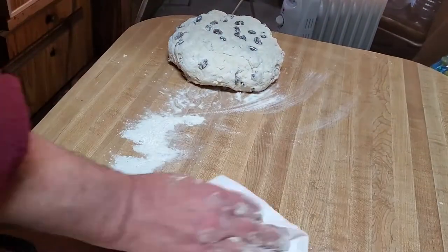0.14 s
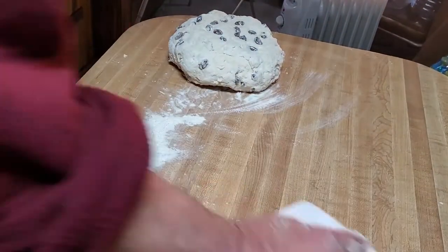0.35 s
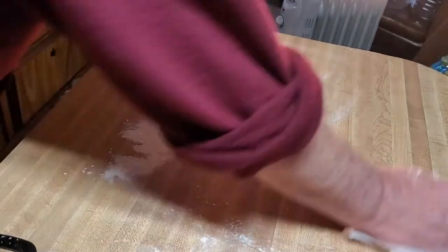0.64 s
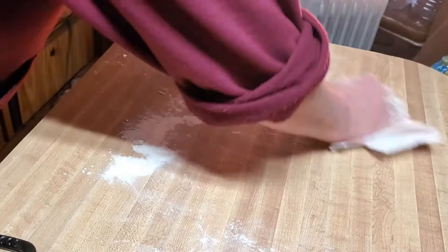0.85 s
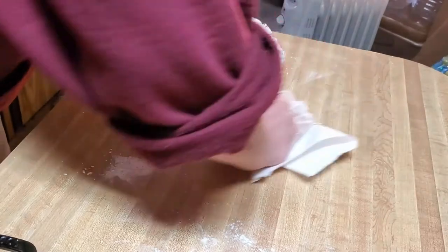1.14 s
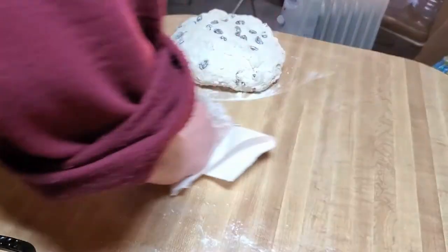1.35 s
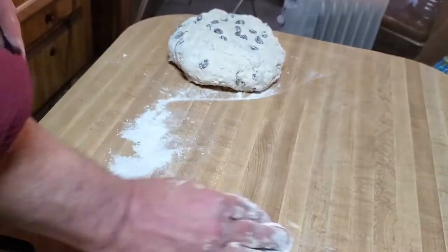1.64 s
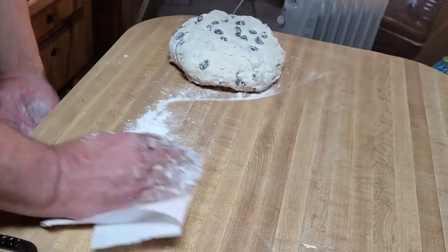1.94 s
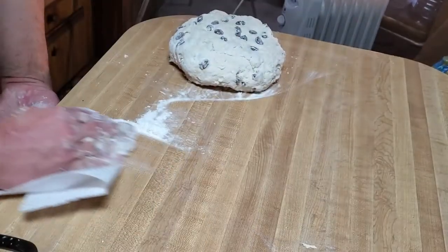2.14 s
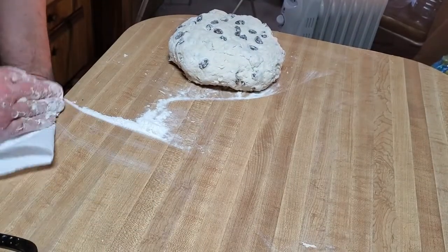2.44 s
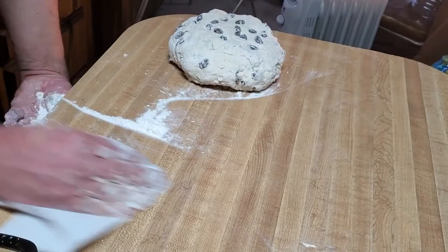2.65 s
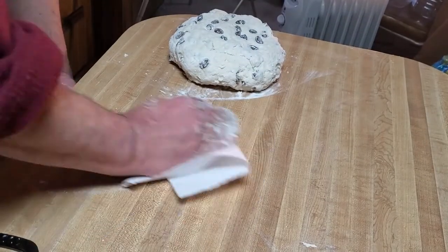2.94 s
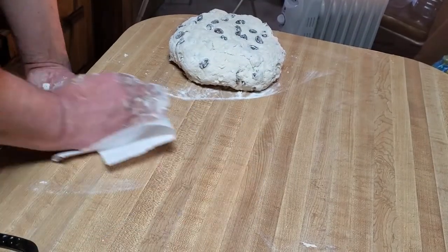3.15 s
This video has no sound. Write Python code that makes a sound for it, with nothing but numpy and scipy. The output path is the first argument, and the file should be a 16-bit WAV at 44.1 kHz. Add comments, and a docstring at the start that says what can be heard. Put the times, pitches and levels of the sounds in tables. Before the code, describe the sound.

A paper towel wipes a floury wooden table, heard close in stereo in a quiet kitchen. A gritty, airy hiss with papery scraping starts at once, with soft bumps around 0.2-0.4 s, and stops near 1.5 s with a tiny tick. The second stroke runs 1.57-2.4 s, with a deep soft thump near 1.75 s. A brisk, brighter third stroke runs from 2.57 s to the end, over faint air and low hum.

```python
"""A hand wipes a paper towel over a floury wooden table in three strokes, close to a small stereo microphone.
The first stroke starts at once: filtered random grains make the flour's hiss, two paper scrapes and the table's hum.
Decaying sine modes thump under the leaning hand; a short ringing tick falls in the first pause, at 1.5 s.
A second stroke runs from about 1.57 to 2.4 s, a third from about 2.57 s to the end.
Shaped noise gives quiet kitchen air and a low, quiet drone throughout."""
import sys
import numpy as np
from scipy import signal
from scipy.io import wavfile
from scipy.ndimage import uniform_filter1d

SR = 44100
rng = np.random.default_rng(int(sys.argv[2]) if len(sys.argv) > 2 else 0)


def generate_wav(sig):
    """Save sig (samples, or channels by samples) to the path in sys.argv[1] as 16-bit PCM at SR."""
    pcm = np.round(np.clip(np.atleast_2d(sig).T, -1, 1) * 32767).astype(np.int16)
    wavfile.write(sys.argv[1], SR, pcm)


N = 145530  # 3.3 s

# Course of the wiping. Each row: time in seconds, then rms levels in dB of the hiss, the upper scrape,
# the lower scrape and the table-top hum, and the left-right balance in dB before PAN_MEAN_DB is taken off.
WIPE_COURSE = [(0.0, -51, -61, -67, -64, 4), (0.05, -48.5, -52.5, -63, -66.5, 3),
               (0.11, -48.5, -56, -59, -58, 4.5), (0.13, -48, -50.5, -52.5, -51.5, 2),
               (0.15, -50, -47, -50.5, -55.5, 4.5), (0.27, -49, -54, -58, -59, 1.5),
               (0.28, -52.5, -56, -59.5, -66, 1.5), (0.32, -52, -55, -56.5, -65, 3.5),
               (0.34, -47.5, -52, -53.5, -56, 3), (0.4, -46, -51, -52, -56.5, 1.0),
               (0.49, -47.5, -56, -59.5, -67, 2), (0.56, -47, -56.5, -54, -65.5, 1.0),
               (0.61, -47.5, -57, -56, -70, 1.5), (0.66, -44, -53, -54, -62.5, 2.0),
               (0.84, -45.5, -58.5, -58.5, -65.5, 2), (0.85, -50, -56, -52.5, -65.5, 2.5),
               (0.91, -53, -55.5, -55.5, -66, 2.0), (0.98, -47.5, -55, -55, -67, 3),
               (1.08, -47, -54, -56, -68.5, 3), (1.12, -46.5, -55.5, -55, -65, 3.0),
               (1.18, -47, -54, -58.5, -77, 2.5), (1.23, -47.5, -52, -51.5, -70, 2.5),
               (1.24, -47.5, -52.5, -56.5, -70, 3.5), (1.32, -47.5, -55.5, -58.5, -68, 3.0),
               (1.35, -52, -56, -60, -75, 3.0), (1.38, -58, -61, -64, -74, 3.0),
               (1.41, -53, -57, -54.5, -67, 3), (1.49, -72.5, -76, -80, -96, 5),
               (1.51, -69, -81, -70, -86, 4.5), (1.52, -74, -80, -74, -95, 4),
               (1.57, -50.5, -63.5, -67, -90, 5.0), (1.59, -53, -55.5, -62.5, -64, 3.5),
               (1.69, -47, -53.5, -57.5, -68, 2.5), (1.73, -48, -52, -58.5, -52.5, 3),
               (1.78, -45.5, -55.5, -56, -61.5, 4.0), (1.85, -46, -53.5, -55.5, -55.5, 3.5),
               (1.95, -46, -54.5, -54.5, -63, 3.5), (1.98, -47.5, -52.5, -55.5, -54.5, 4),
               (2.06, -44.5, -52, -54, -58.5, 3.5), (2.23, -47, -53, -60.5, -61.5, 4.0),
               (2.33, -49, -55, -58.5, -63, 3.5), (2.39, -56, -60, -65, -62, 3.5),
               (2.41, -60, -61, -59, -60.5, 5), (2.43, -67, -63, -65, -60, 4),
               (2.52, -73, -72.5, -78.5, -73.5, 3.0), (2.55, -69, -76, -79, -74, 7.0),
               (2.57, -50.5, -65, -69, -69, 5), (2.59, -45, -56, -65, -63, 6.0),
               (2.64, -42, -58, -61.5, -77, 3), (2.66, -44, -53, -53, -64, 5.0),
               (2.68, -43, -54.5, -59, -67.5, 4), (2.77, -45, -55.5, -60.5, -70, 4.5),
               (2.81, -47, -55, -61.5, -80, 2), (2.93, -46, -52.5, -55.5, -67, 3.0),
               (3.06, -48, -55.5, -57, -66.5, 3), (3.09, -46, -54.5, -60, -64, 3.0),
               (3.17, -46.5, -53.5, -57.5, -65, 3.5), (3.2, -46, -53.5, -58.5, -59.5, 3.0),
               (3.25, -47, -55, -58.5, -66, 2), (3.3, -52, -57, -65, -66, 3.0)]
PAN_MEAN_DB = 3.2

# Spectrum of the flour hiss. Each row: frequency in Hz, relative density in dB per Hz.
HISS_SPECTRUM = [(1470, -5), (2500, -7.5), (3210, -1.5), (3830, -5), (5440, -5), (6600, -1.5), (7250, -4.5),
                 (8870, -5.5), (15200, 0), (16000, -10.5)]
# Spectrum of the paper's upper scrape. Each row: frequency in Hz, relative density in dB per Hz.
UPPER_SCRAPE_SPECTRUM = [(1300, -25), (2000, -1.5), (2800, -0.5), (4000, -3.5), (5500, -5.5), (8000, -18.5)]
# Spectrum of the paper's lower scrape. Each row: frequency in Hz, relative density in dB per Hz.
LOWER_SCRAPE_SPECTRUM = [(500, -26), (850, -4.5), (1200, 0), (1700, 0.5), (2300, -7.5), (3500, -22.5)]
# Resonances of the humming table top. Each row: frequency in Hz, half-power width in Hz, relative peak in dB.
HUM_RESONANCES = [(202, 42, -10.5), (297, 13, -8.5), (476.4, 94, -1.5), (700, 95, -2.5), (883, 13.4, -0.5),
                  (1200, 20, 1)]
GRAINS_PER_S, GRAIN_SPREAD_DB = 22000, 1.1  # mean rate per channel; scale of the exponential spread in size
PATCH_DB, FLICKER_DB = 1.5, 0.42  # rms drift of the hiss spectrum; rms flicker of the grains

# Likeness of the two channels. Each row: frequency in Hz, left-right correlation from 0 to 1.
CHANNEL_LIKENESS = [(60, 0.72), (180, 0.61), (400, 0.61), (800, 0.6), (1500, 0.44), (3000, 0.17),
                    (6000, 0.045), (15000, 0.01)]
# Stereo lean of the noise layers. Each row: frequency in Hz, left-right level difference in dB.
STEREO_LEAN = [(60, -.3), (200, .7), (500, 2.2), (1500, 2.4), (5000, 1.6), (9000, 2.8), (13000, 6),
               (15500, 6.8)]
# Stereo delay of the noise layers. Each row: time in seconds, lag of left behind right in ms.
STEREO_LAG = [(.2, -0.078), (.6, 0.2), (1.0, 0.053), (1.45, -0.036), (1.85, -0.098), (2.25, -0.19),
              (2.7, -0.091), (3.1, -.11)]

# Modes of the table. Each row: frequency in Hz, relative level in dB, 60 dB decay time in seconds,
# group number (rounded down: 0 frame, 1 slab, 2 apron, 3 low boards, 4 high boards).
TABLE_MODES = [(52.7, 5, 0.12, 0), (86.4, 6, .1, 1), (140, 2.5, 0.11, 2.5), (198, 5.5, 0.071, 3.5),
               (256.3, 6.5, 0.0504, 4), (301, -4.5, 0.051, 4), (452, -15, 0.07, 4)]
# Pushes of the hand. Each row: start in seconds, levels in dB of the frame, slab, apron, low boards and
# high boards (each mode adds its relative level), rise time in ms.
HAND_PUSHES = [(0.168, -74, -62, -64, -57, -58, 6), (.199, -72, -39.5, -58, -55, -39, 9.7),
               (0.239, -45, -45, -60, -56, -55, 4.3), (.254, -60, -56, -62, -53, -50, 5),
               (.270, -37.5, -50, -60, -59, -55, 18), (.335, -55, -46, -41, -50, -47, 3.7),
               (.357, -47, -52, -60, -63, -49, 7.6), (0.384, -52, -50, -54, -60, -57, 5.4),
               (0.438, -60, -60.5, -60, -64, -65.5, 7.2), (1.723, -61, -40, -56, -54, -51, 14),
               (1.744, -21.5, -41, -46, -50, -66, 20), (1.788, -53, -42, -60, -61, -62, 6.4),
               (1.830, -36.5, -58, -51, -39.5, -49, 7), (1.861, -58, -59, -58, -52.5, -62, 6),
               (1.887, -43, -64, -65, -67, -57, 10), (1.914, -41.5, -47.5, -60, -66, -64, 13),
               (1.960, -48, -65, -64, -64, -66, 11), (1.999, -55, -50, -58, -41.5, -50, 7.6),
               (2.059, -60, -51, -62, -53, -49.5, 11), (2.394, -74, -79, -72, -54.5, -47, 5),
               (2.43, -70, -78, -68, -64, -55.5, 7.7), (2.464, -74, -65, -63, -57, -58, 4.4),
               (2.487, -78, -78, -66, -65, -61, 5), (2.564, -66, -51.5, -56, -51.5, -57, 11),
               (2.603, -78, -60, -63, -77, -66, 7), (3.195, -74, -69, -62, -56.5, -59, 8)]
THUMP_SKEW_MS = 0.31  # largest shift of each channel, opposite in sign

TICK_S, TICK_DB, TICK_HZ, TICK_T60 = 1.5035, -46, 1500, 0.013  # start and 60 dB decay time in seconds
TICK_TAIL_DB = -32  # echo level at the start of the decay, relative to the direct sound

# Spectrum of the kitchen air. Each row: frequency in Hz, relative density in dB per Hz.
AIR_SPECTRUM = [(15, -19), (25, 8.5), (263, -5), (503, 1.5), (818, -3), (2990, -34.5), (6920, -33),
                (7920, -29), (12200, -17), (14800, -12.5), (16000, -5.5)]
AIR_DB = -70.5
DRONE_HZ, DRONE_WIDTH_HZ, DRONE_DB = 59.4, 13, -76  # width between the points 6 dB down
MIC_LOW_HZ, EDGE_HZ = 43, 15850  # lower and upper cutoff


def gain_of(db):
    """Amplitude ratio: 20 dB is a factor of ten."""
    return 10 ** (np.asarray(db) / 20)


def evened(x):
    """Normalization: scales a signal to rms 1."""
    return x / np.sqrt(np.mean(x ** 2) + 1e-20)


def read(points, hz):
    """Interpolation on a logarithmic frequency axis, held level beyond the ends."""
    f, value = np.transpose(points)
    return np.interp(np.log(hz + 1), np.log(f + 1), value, left=value[0], right=value[-1])


def curve(column):
    """Linear interpolation of one column of the wiping course, sample by sample."""
    rows = np.array(WIPE_COURSE)
    return np.interp(np.arange(N) / SR, rows[:, 0], rows[:, column])


def fall_below(corner_hz, db_per_octave, hz):
    """High-pass slope: the loss in dB below a corner frequency."""
    return db_per_octave * np.log2(np.maximum(corner_hz / (hz + 1), 1))


def colour(drive, db_at, patch_db, size=512, count=6):
    """Short-time spectral filtering: two drives become a partly correlated pair with drifting spectral patches."""
    overlap = size * 3 // 4
    hz, t, (a, b) = signal.stft(drive, SR, nperseg=size, noverlap=overlap)

    # patches are smoothed over 16 frames, then over count frequency bins
    patches = rng.standard_normal((len(t), len(hz)))
    patches = uniform_filter1d(patches, 16, 0)
    patches = evened(uniform_filter1d(patches, count, 1)).T

    same = np.clip(read(CHANNEL_LIKENESS, hz), -1, 1)[:, None]
    side = read(STEREO_LEAN, hz)[:, None] / 2
    lag_ms = np.interp(t, *np.transpose(STEREO_LAG))
    lag = np.exp(-2j * np.pi * np.outer(hz, lag_ms) / 1000)  # a delay is a phase turn
    left = a * lag * gain_of(side)
    right = (same * a + np.sqrt(1 - same ** 2) * b) / gain_of(side)

    spectrum = gain_of(db_at(hz)[:, None] + patch_db * patches)
    out = signal.istft(np.array([left, right]) * spectrum, SR, nperseg=size, noverlap=overlap)[1][:, :N]
    return out / np.sqrt(np.mean(out.mean(0) ** 2))  # rms 1 in the mean of the channels


def grains():
    """Stick-slip friction: dense tiny slips at random instants, unequal in size, flickering with the grip."""
    size_db = GRAIN_SPREAD_DB * np.minimum(rng.exponential(1, (2, N)), 3)
    slips = rng.random((2, N)) < GRAINS_PER_S / SR
    grip = uniform_filter1d(rng.standard_normal(N), 900)
    grip = evened(uniform_filter1d(grip, 900))
    return gain_of(size_db) * slips * rng.standard_normal((2, N)) * gain_of(FLICKER_DB * grip)


def flour_hiss():
    """Granular noise: slips with a broad spectrum that falls steeply below 4 kHz."""
    return colour(grains(), lambda hz: read(HISS_SPECTRUM, hz) - fall_below(4000, 14, hz), PATCH_DB)


def paper_scrape(spectrum, patch_db):
    """Band-shaped friction noise: slips coloured by one band of the paper."""
    return colour(grains(), lambda hz: read(spectrum, hz), patch_db, size=1024, count=2)


def table_hum():
    """Forced resonance: slips drive the table top, whose resonances add in power."""
    def ring(hz):
        power = sum(gain_of(2 * db) / (1 + (2 * (hz - f) / width) ** 2) for f, width, db in HUM_RESONANCES)
        return 10 * np.log10(power) - fall_below(150, 18, hz)
    return colour(grains(), ring, 3.65, size=2048, count=2)


def wiping():
    """Superposition: hiss and scrapes move across with the hand, over the hum of the table top."""
    moving = gain_of(curve(column=1)) * flour_hiss()
    moving = moving + gain_of(curve(column=2)) * paper_scrape(UPPER_SCRAPE_SPECTRUM, 2.85)
    moving = moving + gain_of(curve(column=3)) * paper_scrape(LOWER_SCRAPE_SPECTRUM, 1.8)
    pan = (curve(column=5) - PAN_MEAN_DB) / 2
    return moving * gain_of([pan, -pan]) + gain_of(curve(column=4)) * table_hum()


def thumps():
    """Modal decay: soft pushes of the hand ring the frame, slab, apron and boards as damped sines."""
    out = np.zeros((2, N + SR))  # room for the last decay
    t = np.arange(SR // 3) / SR
    skews = THUMP_SKEW_MS * rng.uniform(-1, 1, len(HAND_PUSHES))
    for (start, *levels, rise_ms), skew in zip(HAND_PUSHES, skews):
        at = round(start * SR)
        rise = np.sin(np.pi / 2 * np.minimum(t * 1000 / rise_ms, 1)) ** 2
        ear_t = t + skew * np.array([[1], [-1]]) / 1000
        for hz, db, t60, group in TABLE_MODES:
            envelope = rise * gain_of(levels[int(group)] + db - 60 * t / t60)
            out[:, at:at + len(t)] += envelope * np.sin(2 * np.pi * hz * ear_t)
    return out[:, :N]


def tick():
    """Convolution with an impulse response: one small damped ping and its short scatter of echoes."""
    out, t = np.zeros((2, N)), np.arange(900) / SR
    envelope = np.minimum(t / 0.00072, 1) * gain_of(TICK_DB - 60 * t / TICK_T60)
    ping = envelope * np.sin(2 * np.pi * TICK_HZ * t)
    echo_t = np.arange(1500) / SR
    echoes = rng.standard_normal((2, 1500)) * gain_of(TICK_TAIL_DB - 60 * echo_t / 0.09)
    echoes[:, :100] = 0  # a gap before the echoes
    echoes[:, 0] = 1  # the direct sound
    sound = signal.fftconvolve(ping[None], echoes, axes=1)
    at = round(TICK_S * SR)
    out[:, at:at + sound.shape[1]] = sound
    return out


def kitchen_air():
    """Stationary noise: steady random drive shaped into the quiet air of the kitchen."""
    air = colour(rng.standard_normal((2, N)), lambda hz: read(AIR_SPECTRUM, hz), 0.94, size=2048)
    return gain_of(AIR_DB) * air


def low_drone():
    """Narrow-band noise: a band only some hertz wide is heard as a low hum near 60 Hz."""
    def peak(hz):
        return -20 * np.log10(1 + (2 * (hz - DRONE_HZ) / DRONE_WIDTH_HZ) ** 2)
    return gain_of(DRONE_DB) * colour(rng.standard_normal((2, N)), peak, 0.092, size=8192)


def scene():
    """Superposition: the pressures of all sources add."""
    return wiping() + thumps() + tick() + kitchen_air() + low_drone()


def record(dry):
    """Band limiting: the microphone drops the deepest bass, then a steep filter removes the top treble."""
    thin = signal.sosfilt(signal.butter(2, MIC_LOW_HZ, "high", fs=SR, output="sos"), dry)
    low_pass = signal.firwin(1023, EDGE_HZ, window=("kaiser", 10), fs=SR)
    return signal.oaconvolve(thin, low_pass[None], "same")


dry = scene()
out = record(dry)
generate_wav(out)
```